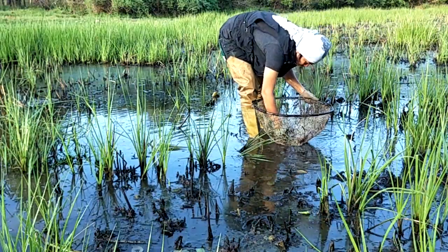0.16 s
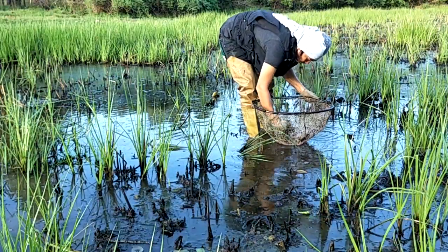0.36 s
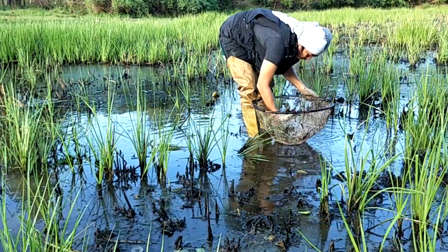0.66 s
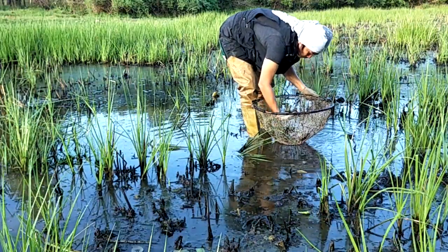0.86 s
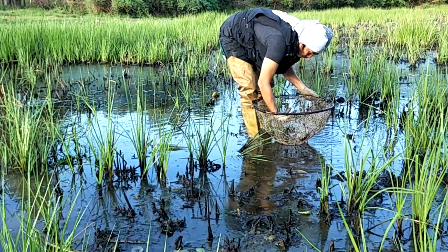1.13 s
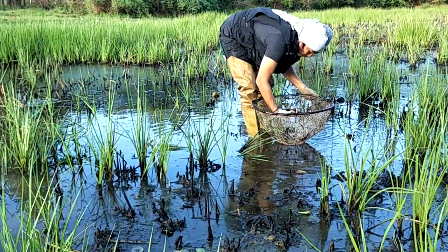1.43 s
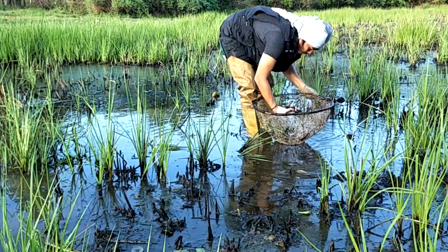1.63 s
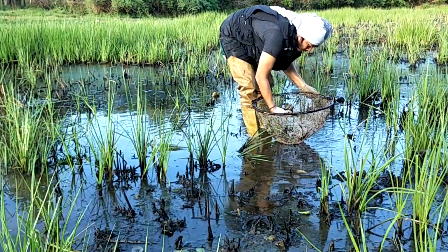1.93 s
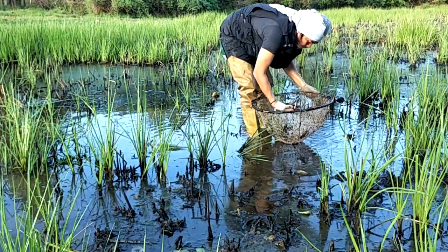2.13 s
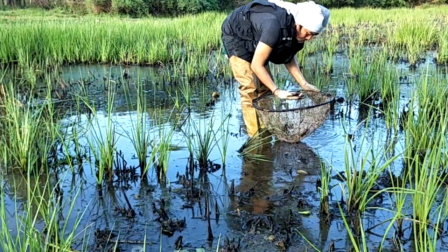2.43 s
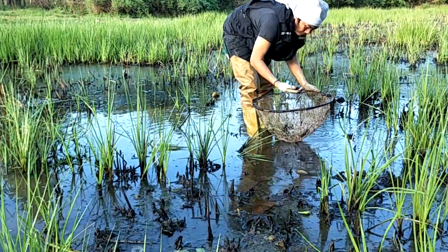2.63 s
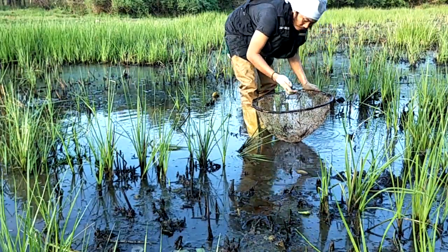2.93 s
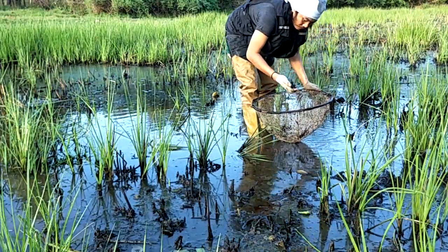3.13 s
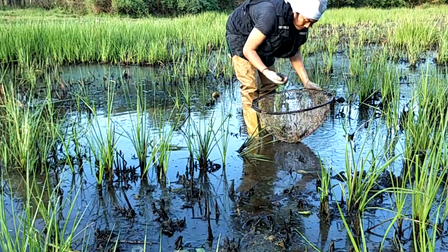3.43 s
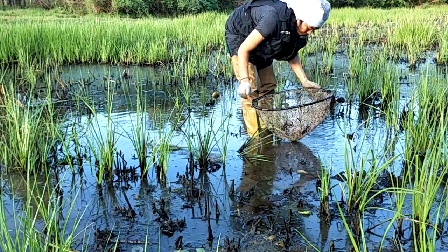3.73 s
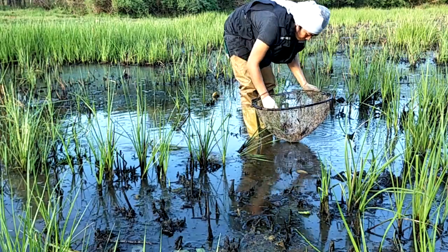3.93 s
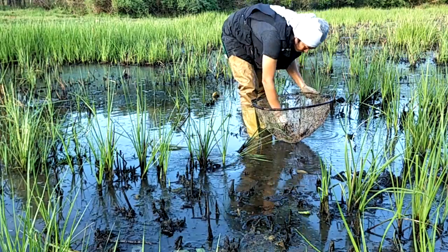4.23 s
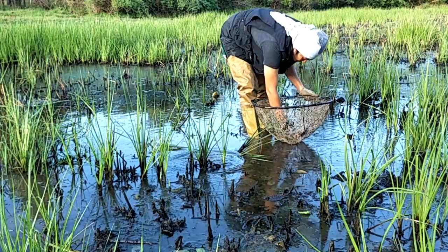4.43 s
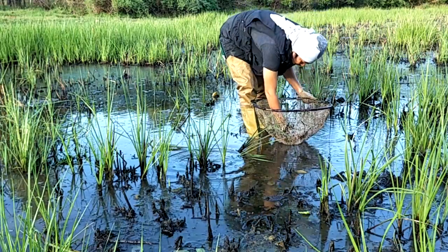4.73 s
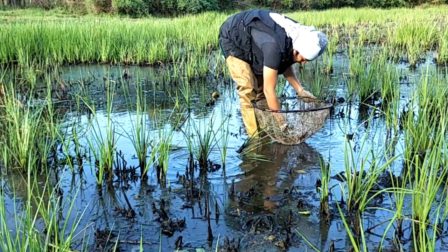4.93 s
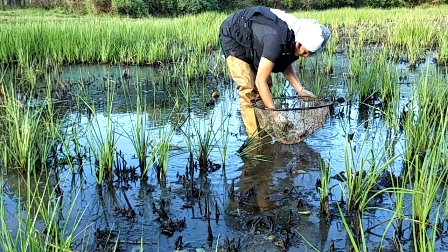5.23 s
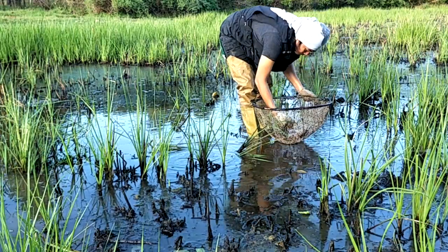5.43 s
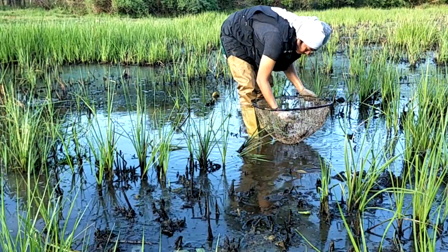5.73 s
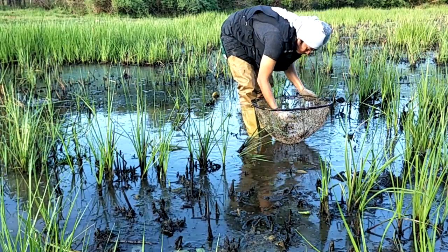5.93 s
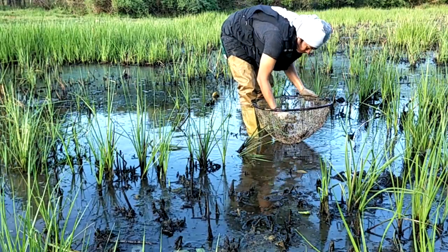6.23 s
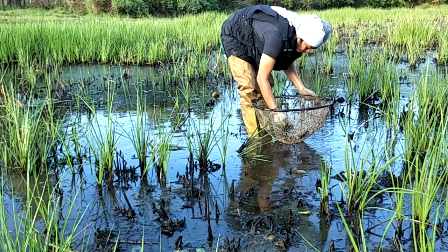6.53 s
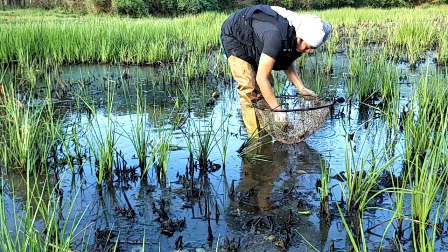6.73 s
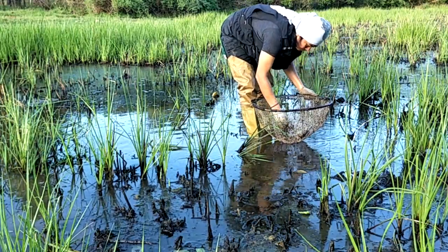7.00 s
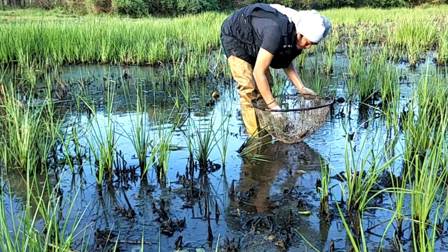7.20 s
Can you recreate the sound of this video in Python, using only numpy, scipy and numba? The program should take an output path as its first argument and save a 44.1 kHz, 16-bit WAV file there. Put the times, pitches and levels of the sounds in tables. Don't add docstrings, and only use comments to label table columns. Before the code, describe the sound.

A continuous soft frog chorus and distant leaf wash fill an open reedy pond. Wind thumps the microphones, strongest before four seconds, then eases. Fast rising bird trills, thin whistles and burry far calls come from the left. Water drops click and ring as bubbles, a handful splashes at about 3.8 seconds, faint insects buzz, and a right-hand bird chirps sharp phrases at the end.

```python
import sys
import numpy as np
from scipy import signal
from scipy.fft import rfft, irfft
from scipy.io import wavfile
from scipy.ndimage import uniform_filter1d
from numba import njit

SR = 44100
rng = np.random.default_rng(int(sys.argv[2]) if len(sys.argv) > 2 else 0)


def gain_from_db(level_db):
    decades = np.asarray(level_db, float) / 20
    return 10 ** decades


def dump_mix(stems):
    frames = np.atleast_2d(stems).T
    limited = np.clip(frames, -1, 1)
    pcm = np.round(limited * 32767).astype(np.int16)
    wavfile.write(sys.argv[1], SR, pcm)


N = 324576

# pitch_hz, density_db (per Hz)
WIND_COLOUR = [(11, -52.5), (18, -8.5), (65, 3.5), (97, 3.5), (162, -5.5), (280, -35.5), (322, -26),
               (387, -37.5), (520, -50.5), (680, -72.5), (1140, -120)]
# pitch_hz, density_db
GUST_EDGE_COLOUR = [(110, -12), (170, 2.0), (260, -17), (420, -36.0)]
# time_s, left_db, right_db
LULL = [(0, -50.5, -43.5), (1.0, -46, -42), (1.5, -51, -44.5), (2.5, -44, -42.5), (3.3, -50, -46.5),
        (3.9, -48.5, -47.5), (4.4, -50, -51.5), (7.36, -52, -51)]
# middle_s, peak_db
LEFT_GUSTS = [(.11, -49), (.46, -47), (.97, -41.5), (1.78, -44.5), (2.11, -46), (2.33, -49), (2.68, -41),
              (3.0, -42), (3.27, -36), (3.55, -42.5), (3.72, -46), (3.89, -47), (4.84, -44.5),
              (5.24, -50.5), (5.82, -47.5), (5.98, -46.5)]
# middle_s, peak_db
RIGHT_GUSTS = [(.22, -34), (.61, -35), (.79, -34), (1.17, -36.5), (1.46, -61), (1.78, -40), (1.92, -34.5),
               (2.06, -48.5), (2.28, -41.5), (2.52, -33), (2.69, -37), (2.91, -34), (3.15, -47.5),
               (3.4, -33.5), (3.66, -49.5), (3.85, -44.5), (5.8, -62)]
# middle_s, peak_db, pitch_hz, left_minus_right_db
THUMPS = [
    (0.465, -32.5, 100, 7),
    (3.196, -36, 99, 20),
    (3.297, -29.5, 99, 11),
    (3.418, -34.5, 92, -12),
    (3.6104, -38.5, 102.6, 31.5),
    (3.6224, -28.5, 106, 25.5),
    (3.719, -38.5, 110, 15.5),
    (3.851, -41, 96, -20),
]
# pitch_hz, density_db (per Hz)
WASH_COLOUR = [(200, -74), (400, -87), (700, -89.5), (1100, -92), (1600, -92.5), (3200, -89), (4500, -93),
               (4750, -108), (6500, -113), (7000, -117), (8100, -120), (8700, -114), (9700, -120),
               (11000, -117), (12700, -118)]
# time_s, low_chorus_db, high_chorus_db
CHORUS = [(0.0, -65.5, -65), (4.1, -64, -66), (5.53, -66, -65.5), (6.7, -65.5, -64.5), (7.36, -65.5, -64.5)]
# pitch_hz, spread_hz, level_db
LOW_FROGS = [(1862, 78, -3), (2293, 92, -3.5), (2515, 121, -1)]
# pitch_hz, spread_hz, level_db
HIGH_FROGS = [(3770, 96, -4.5), (4021, 78, -1), (4300, 99, -10)]
# start_s, length_s, first_hz, last_hz, level_db
CROAKS = [
    (0.001, 0.097, 320.5, 333, -61),
    (.31, 0.21, 312, 332.4, -66),
    (.66, 0.14, 311, 328, -64),
    (1.02, 0.12, 301.6, 337, -60.5),
    (1.389, 0.17, 301, 334, -61.5),
]
# start_s, length_s, level_db
TICKER = [
    (6.527, .09, -59.5),
    (8.2, .04, -61.5),
    (1.7, .01, -59),
]
# time_s, level_db
KATYDID = [(0, -104), (.9, -97), (1.3, -89), (1.8, -85), (2.4, -84), (2.85, -82), (2.95, -89), (3.05, -100),
           (6.2, -100), (6.5, -99), (7.36, -99)]
# pitch_hz, density_db
KATYDID_COLOUR = [(8300, -22), (8550, 0), (8850, -1.0), (9100, -7.0), (9300, -28)]
# start_s, length_s, level_db
BUZZES = [
    (1.77, 0.16, -91),
    (2.024, 0.23, -87.5),
    (2.38, 0.15, -89),
    (5.17, 0.18, -90),
    (5.5, 0.21, -90.5),
    (5.86, 0.21, -89),
]
# pitch_hz, density_db
BUZZ_COLOUR = [(6800, -28), (7100, -1), (7500, 1.0), (7800, -2), (8000, -23)]
# time_s, level_db
RUSTLE = [(0.0, -87), (0.63, -79), (1.76, -91), (2.01, -75.5), (4.24, -93), (6.11, -82), (7.36, -90)]
# pitch_hz, density_db
LOW_LEAF_COLOUR = [(4600, -7.5), (4800, -4.5), (5600, -7.5), (5800, -16.0)]
HIGH_LEAF_COLOUR = [(5500, -16.5), (5800, 10.0), (6500, -5.0), (6900, -33)]
# middle_s, length_s, middle_hz, peak_db
TRILLS = [(0.015, .018, 3340, -49.5), (0.045, 0.019, 3320, -48), (0.075, 0.019, 3410, -45),
          (.103, .018, 3220, -51.5), (.619, .014, 3300, -51), (.651, 0.019, 3230, -51.5),
          (0.683, .02, 3300, -48.5), (.712, .016, 3320, -49), (.744, 0.023, 3350, -46),
          (0.777, 0.021, 3290, -47.5), (0.809, .016, 3310, -49), (1.249, 0.015, 3270, -51),
          (1.278, .022, 3160, -50.5), (1.311, 0.018, 3200, -52), (1.338, .014, 3330, -52),
          (1.369, 0.013, 3290, -50.5), (1.402, .014, 3260, -53), (1.415, .008, 3150, -51),
          (2.028, .018, 3230, -51), (2.065, .016, 3340, -50), (2.099, .021, 3290, -47.5),
          (2.131, .019, 3330, -48.5), (2.166, 0.017, 3580, -44.5), (4.701, .011, 3400, -53),
          (4.728, .012, 3300, -51), (4.757, .016, 3230, -49), (4.787, .019, 3300, -48),
          (4.82, .017, 3280, -47.5), (4.851, .018, 3280, -47), (4.882, 0.018, 3240, -49.5),
          (4.914, .015, 3370, -48), (4.944, .009, 3350, -53)]
# start_s, length_s, first_hz, last_hz, peak_db
CLOSERS = [
    (0.126, 0.024, 3190, 3620, -44),
    (0.83, 0.024, 3280, 3600, -46.5),
    (1.426, 0.022, 3180, 3700, -48),
    (1.449, .018, 3090, 3650, -45),
    (1.472, 0.026, 3330, 3670, -45),
    (1.499, 0.018, 3490, 3250, -49),
    (2.193, .024, 3170, 3720, -45.5),
    (2.235, 0.017, 3245, 3370, -48),
    (4.961, 0.019, 3280, 3530, -47),
    (4.974, 0.021, 3490, 3220, -50.5),
]
# start_s, length_s, first_hz, last_hz, level_db
WHISTLES = [(0.681, 0.076, 755, 755, -67.5), (0.835, 0.17, 3180, 2750, -59),
            (1.51, 0.089, 1947, 1952, -59.5), (3.42, 0.045, 4700, 4640, -75), (4.29, 0.12, 2990, 2700, -64),
            (4.634, 0.12, 2800, 2940, -60), (4.761, 0.066, 2570, 2470, -61),
            (5.722, 0.025, 1480.0, 1600, -66), (5.748, 0.078, 3430, 3370, -61),
            (6.44, 0.05, 4650, 4700, -72), (7.274, 0.1, 832, 821, -69.5)]
# start_s, length_s, first_hz, last_hz, level_db
BURRS = [(0.31, 0.045, 5600, 4600, -77.5), (0.352, 0.04, 4600, 3950, -65), (0.98, 0.39, 669, 618.5, -74.5),
         (1.675, 0.059, 3286, 3186, -59), (1.721, 0.1, 2900.0, 2740, -65), (2.19, 0.024, 5140, 5340, -70),
         (2.21, 0.067, 5420, 5470, -65), (2.41, 0.115, 2830, 2900, -59.5), (2.935, 0.09, 3140, 3080, -66.5),
         (3.04, .2, 2150, 2040, -67.5), (3.115, 0.019, 1700, 2010, -57), (4.864, .02, 1880, 1860, -64),
         (3.012, 0.12, 3250, 2890, -63.5), (3.03, 0.13, 1867, 1950, -65), (3.106, 0.096, 1982, 1790, -62),
         (3.2, 0.086, 1895, 2013, -65.5), (3.275, 0.12, 3280, 3150, -68), (4.06, 0.04, 2560, 2580, -65),
         (4.122, .022, 2565, 2610, -65), (4.615, .02, 3050, 2750, -64), (5.53, 0.15, 3076, 3130, -64),
         (5.679, 0.074, 1925, 1848, -60.5), (5.825, 0.087, 3045, 3000, -60.5),
         (1.93, .085, 3250, 3070, -61), (3.85, 0.13, 2103, 1863, -62.5)]
# delay_s, length_s, first_hz, last_hz, level_db, fade_nepers
PHRASE = [
    (0, .012, 4330, 4020, -48, .1),
    (.0255, .011, 3800, 2500, -43, 1.2),
    (.04, .047, 3650, 3840, -56, -1.6),
]
# start_s, level_db
SUNG = [
    (6.429, -3.5),
    (6.697, -1.6),
    (6.935, -3),
    (7.191, -2.5),
]
# start_s, peak_db, pitch_hz
DROPS = [(0.571, -54.5, 1840), (.703, -50, 1840), (1.428, -53.5, 1660), (1.653, -47, 1750),
         (1.863, -45, 1930), (2.015, -43.5, 1554), (3.478, -44.5, 1873), (3.875, -49, 1770),
         (3.965, -48, 2580), (4.011, -54, 1290), (4.082, -46, 1230), (4.912, -51.5, 1340),
         (5.682, -50.5, 1640), (5.713, -47.5, 1500), (6.061, -49, 1640), (6.549, -49, 1830),
         (6.666, -53, 2050)]
# start_s, peak_db, pitch_hz, t60_s, crack_over_bubble_db
SPLASH = [(3.7665, -48, 1640, 0.0087, -6), (3.7888, -40.5, 1300, 0.024, -1),
          (3.7888, -41, 2750, 0.0091, -8), (3.798, -47, 4050, .01, -12), (3.836, -44.5, 1300, .025, -8),
          (3.5, -53, 2000, .01, -12), (3.82, -49, 2000, .012, -10), (3.827, -44, 2750, .014, -18),
          (3.851, -51, 2650, 0.015, -12), (3.856, -48, 2080, .025, -22), (3.889, -48, 2020, .025, -20),
          (.714, -48, 2350, .01, -6), (3.8015, -38, 2680, 0.016, -10), (3.81, -43, 2950, .012, -12),
          (3.5, -49, 3100, .012, -11), (3.8265, -39, 1520, 0.017, -8), (3.844, -46, 2100, .012, -10),
          (7.066, -50.5, 1160, 0.019, -4), (5.854, -48, 2340, 0.014, -4), (4.046, -47, 2600, .02, -20),
          (4.045, -43.5, 1760, 0.0093, -9), (.733, -45.5, 1290, 0.013, -9)]
# start_s, t60_s, first_hz, last_hz, peak_db
SLIDES = [
    (4.045, .022, 1650, 900, -38),
    (4.049, .065, 1400, 1050, -46),
    (3.7888, .075, 1250, 1130, -42),
    (2.976, .075, 1080, 1500, -48),
    (6.662, .016, 2600, 1500, -46),
    (1.342, .02, 2600, 1500, -49),
]
# start_s, length_s, first_hz, last_hz, level_db
TICKS = [
    (0.474, 0.0065, 3950, 3000, -47.5),
    (0.577, 0.0079, 4400, 3180, -52),
    (1.36, 0.006, 4620, 3500, -44.5),
    (1.4, .005, 4600, 4000, -53),
    (1.903, 0.006, 4100, 3000, -47.5),
    (1.932, 0.006, 4580, 4300.0, -52),
    (2.077, 0.0086, 5940, 4920.0, -53),
    (5.035, 0.0049, 4100, 3380, -45),
    (5.594, 0.003, 4230, 3970, -43),
]
# start_s, length_s, lowest_hz, highest_hz, level_db
SPRAY = [(0.545, .2, 4600, 6200, -80), (1.35, 0.062, 4200, 5600, -75), (1.852, 0.059, 4230, 7240, -66),
         (1.917, 0.031, 4200, 7000, -59.5), (2.002, 0.13, 4300, 7200, -60), (3.24, 0.29, 4760, 6070, -70.5),
         (3.77, 0.004, 4260, 9000, -68), (3.794, 0.012, 3270, 8700, -50), (3.796, 0.008, 9500, 12500, -71),
         (3.802, 0.06, 2200, 4600, -62), (3.832, 0.023, 4570, 7500, -63)]
# start_s, length_s, level_db
MIST = [
    (3.812, .052, -88),
    (5.572, .04, -94),
]
# pitch_hz, density_db
MIST_COLOUR = [(13000, -10), (13500, 0), (14200, 0), (14600, -10)]

GUST_S = 0.06
LEFT_LAG, RIGHT_LAG = 17, -21
RISE_HZ = 596
RING_S, RING_LAW = 0.044, .5
CRACK_DB = -11.5


def column(table, k):
    table = np.asarray(table, float)
    return np.interp(np.arange(N) / SR, table[:, 0], table[:, k])


def coloured(points):
    hz, db = np.transpose(points)
    f = np.maximum(np.fft.rfftfreq(N, 1 / SR), 1)
    gain = gain_from_db(np.interp(np.log(f), np.log(hz), db, left=-160, right=-160))
    return irfft(rfft(rng.standard_normal((2, N))) * gain, N)


def unit(x):
    return x / np.sqrt(np.mean(x ** 2))


def walk(rate):
    hold = int(SR / rate)
    steps = np.repeat(rng.standard_normal((2, N // hold + 1)), hold, axis=1)
    return 1.12 * uniform_filter1d(uniform_filter1d(steps, hold), hold)[:, :N]


def bursts(table, ramp_s):
    t = np.arange(N) / SR
    return sum(gain_from_db(db) * np.clip(np.minimum(t - s, s + length - t) / ramp_s, 0, 1) for s, length, db in table)


@njit
def glide(rows, n, sr, soft, fade):
    out = np.zeros((2, n + 64))
    for s, length, hz0, hz1, left, right, lag, turn in rows:
        m = length * sr
        for i in range(int(m)):
            u = i / m
            v = np.sin(np.pi * u) ** soft * np.exp(-fade * u)
            v *= np.sin(turn + 2 * np.pi * length * u * (hz0 + (hz1 - hz0) * u / 2))
            j = int(s * sr) + i
            if 0 <= j < n and j + lag >= 0:
                out[0, j] += left * v
                out[1, j + int(lag)] += right * v
    return out[:, :n]


def notes(s, length, hz0, hz1, db, pan_db, lag, soft, fade, turn=0.):
    left, right = gain_from_db(db + pan_db / 2), gain_from_db(db - pan_db / 2)
    rows = np.broadcast_arrays(s, length, hz0, hz1, left, right, lag, turn)
    return glide(np.ascontiguousarray(np.transpose(rows), float), N, 1. * SR, 1. * soft, 1. * fade)


def reeds(x, t60, wet_db):
    t = np.arange(int(.3 * SR)) / SR
    tail = rng.standard_normal((2, len(t))) * np.exp(-np.log(1000) * t / t60)
    tail *= t > .004
    tail *= gain_from_db(wet_db) / np.sqrt(np.sum(tail ** 2, axis=1, keepdims=True))
    return x + signal.fftconvolve(x, tail, axes=1)[:, :N]


def gusts(table, k):
    t = np.arange(0, N, 64) / SR
    s, db = np.transpose(table)[:, :, None]
    swell = np.sum(gain_from_db(db) * np.exp(-((t - s) / GUST_S) ** 2), axis=0)
    return 20 * np.log10(gain_from_db(column(LULL, k)) + np.interp(np.arange(N) / SR, t, swell))


def breeze():
    gust_db = np.array([gusts(LEFT_GUSTS, k=1), gusts(RIGHT_GUSTS, k=2)]) + 2.67 * walk(14)
    rumble = unit(coloured(WIND_COLOUR)) * gain_from_db(gust_db)
    edge = unit(coloured(GUST_EDGE_COLOUR)) * gain_from_db(-63 + 1.26 * (gust_db + 43.5))
    s, db, hz, side_db = np.transpose(THUMPS)
    length = 2.32 / hz
    turn = np.pi * (.5 - hz * length)
    body = notes(s - length / 2, length, hz, hz, db, side_db, 0, 3.3, 0, turn)
    crest = notes(s - length / 4, length / 2, 2 * hz, 2 * hz, db - 13.0, side_db, 0, 1.6, 0, turn)
    return rumble + edge + body + crest


def frogs(kinds, count, pulse_s, scatter_db):
    out = 0
    for hz, spread_hz, db in kinds:
        caller = rng.random((count, 5))
        beat = np.arange(int(N / SR * 110))
        pulse_rate = 55 + 50 * caller[:, :1]
        s = beat / pulse_rate + .003 * rng.random((count, len(beat)))
        voice_hz = hz + spread_hz * np.linspace(-1.5, 1.5, count)[:, None]
        pitch = voice_hz + 110 * rng.standard_normal(s.shape)
        phrase = np.sin(2 * np.pi * (s * (1.5 + 3 * caller[:, 2:3]) + caller[:, 3:4]))
        size = db + 7 * phrase + scatter_db * rng.standard_normal(s.shape)
        lag = np.round(44 * caller[:, 4:] - 22) + 0 * s
        pan_db = lag * 0.038
        turn = 2 * np.pi * rng.random(s.shape)
        on = s < N / SR
        out = out + notes(s[on], pulse_s, pitch[on], pitch[on], size[on], pan_db[on], lag[on], 0.99, 2.5, turn[on])
    return unit(out)


def marsh():
    low = frogs(LOW_FROGS, count=5, pulse_s=0.0081, scatter_db=2.0) * gain_from_db(-2.5 + column(CHORUS, 1))
    high = frogs(HIGH_FROGS, count=5, pulse_s=0.0065, scatter_db=2.5) * gain_from_db(-3.0 + column(CHORUS, 2))
    croak = notes(*np.transpose(CROAKS), 0, 0, 0.25, 0) * gain_from_db(0.79 * walk(30))
    wash = coloured(WASH_COLOUR) * gain_from_db(33.5 + 1.33 * walk(3) + 0.8 * walk(20))
    return reeds(low + high, .2, -3) + croak + wash


def insects():
    t = np.arange(N) / SR
    throb = .62 + .38 * np.tanh(2.2 * np.cos(2 * np.pi * 8.15 * (t - 2.555)) + .6)
    strokes = .5 + .5 * np.cos(2 * np.pi * 110.0 * t)
    wing = unit(coloured(KATYDID_COLOUR))
    katydid = wing * (unit(throb * strokes) * gain_from_db(column(KATYDID, 1)) + gain_from_db(-97))
    rasp = (.5 + .5 * np.cos(2 * np.pi * 174 * t)) ** 0.9
    file = unit(coloured(BUZZ_COLOUR))
    buzz = bursts(BUZZES, .035) * unit(rasp) * (file[0] + 0.5 * file)
    return katydid + buzz


def leaves():
    low = unit(coloured(LOW_LEAF_COLOUR)) * gain_from_db(4.4 * walk(8.2))
    high = unit(coloured(HIGH_LEAF_COLOUR)) * gain_from_db(3 * walk(14))
    return (low + high) * gain_from_db(-4.0 + column(RUSTLE, 1))


def ticker():
    out = 0
    for s, length, db in TICKER:
        beat = np.arange(s, s + length, .0195)
        out = out + notes(beat, 0.011, 4130, 3750, db, 1.5, RIGHT_LAG, 0.47, 0)
    return reeds(out, 0.14, -4)


def trill_notes():
    s, length, hz, db = np.transpose(TRILLS)
    rows = np.array([s - length / 2, length, hz - RISE_HZ / 2, hz + RISE_HZ / 2, db])
    return np.hstack([rows, np.transpose(CLOSERS)])


def birds():
    trill = notes(*trill_notes(), 2.0, LEFT_LAG, 0.98, 0)
    whistle = notes(*np.transpose(WHISTLES), 2.5, LEFT_LAG, 0.24, 0) * gain_from_db(2.3 * walk(90)[0])
    throb = np.abs(np.sin(np.pi * 37 * np.arange(N) / SR + .8 * walk(12)[0])) ** .5
    roughness = gain_from_db(2.5 + 6 * np.tanh(walk(330)[0]))
    burr = notes(*np.transpose(BURRS), 3.5, LEFT_LAG, .35, 0) * throb * roughness
    s, loud_db = np.transpose(SUNG)
    phrase = sum(notes(s + delay, length, hz0, hz1, db + loud_db, -.6, RIGHT_LAG, .7, fade)
                 for delay, length, hz0, hz1, db, fade in PHRASE)
    return reeds(trill + phrase, .22, -11) + reeds(whistle, .2, -7) + reeds(burr, .22, -3)


def mist():
    return bursts(MIST, .015) * unit(coloured(MIST_COLOUR))


def spray():
    out = 0
    for start, length, low_hz, high_hz, level_db in SPRAY:
        when, height, luck, side = rng.random((30, 4)).T
        pitch = low_hz * (high_hz / low_hz) ** height
        size_db = level_db - 11 * np.log2(pitch / low_hz) - 3.4 * np.log(luck + 0.08) + 8
        pan_db = 8 * side - 2.5
        out = out + notes(start + length * when, 12 / pitch, pitch, 1.1 * pitch, size_db, pan_db, 1, .9, 5)
    return out


def water():
    drops = [(s, db, hz, RING_S * (1500 / hz) ** RING_LAW, CRACK_DB) for s, db, hz in DROPS]
    s, db, hz, t60, crack_db = np.transpose(drops + SPLASH)
    bubble = notes(s, t60, hz, 1.02 * hz, db - 1.5, .4, 1, .04, np.log(1000))
    bubble = bubble + notes(*np.transpose(SLIDES), .4, 1, .04, np.log(1000))
    crack = notes(s, .0045, 1.7 * hz, .8 * hz, db + 6 + crack_db, .4, 1, .06, 5)
    ticks = notes(*np.transpose(TICKS), 2.5, 2, .5, 1.5)
    soft_water = signal.butter(3, (950, 4400), "band", fs=SR, output="sos")
    plops = signal.sosfilt(soft_water, bubble + crack)
    return reeds(plops + ticks + spray(), .08, -10)


def scene():
    return breeze() + marsh() + insects() + leaves() + ticker() + birds() + mist() + water()


def band_limit(x):
    return signal.sosfilt(signal.butter(12, 14600, fs=SR, output="sos"), x)


def record(dry):
    return band_limit(dry)


dry = scene()
out = record(dry)
dump_mix(out)
```